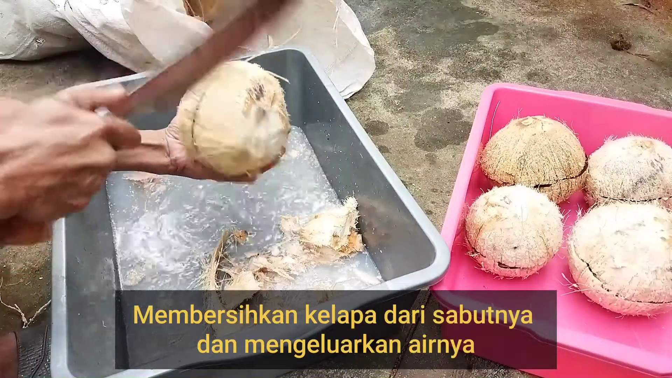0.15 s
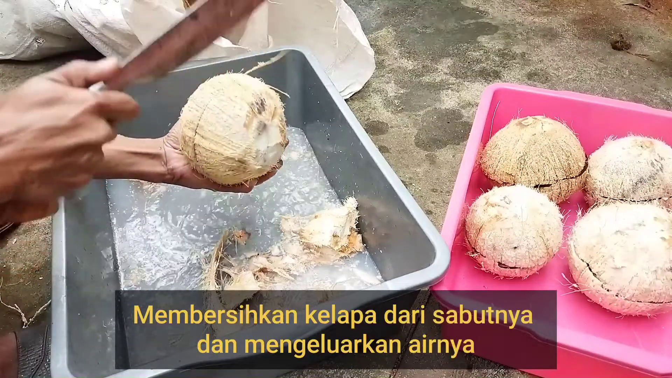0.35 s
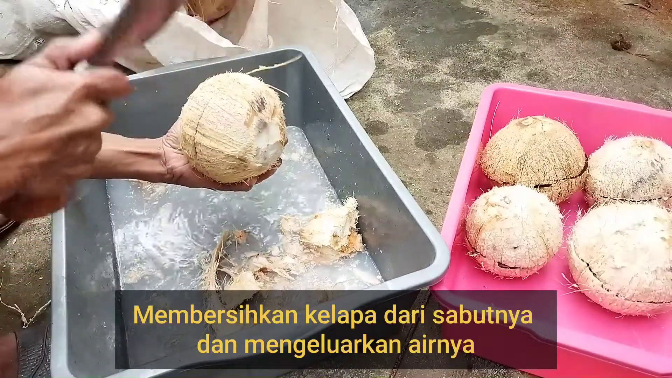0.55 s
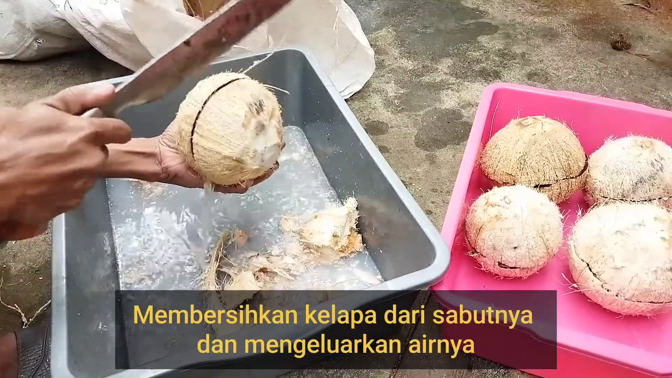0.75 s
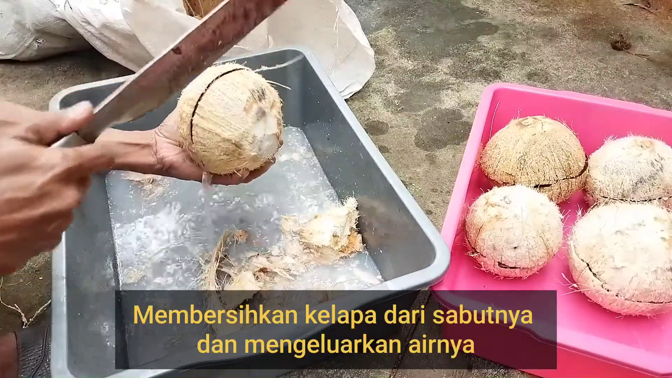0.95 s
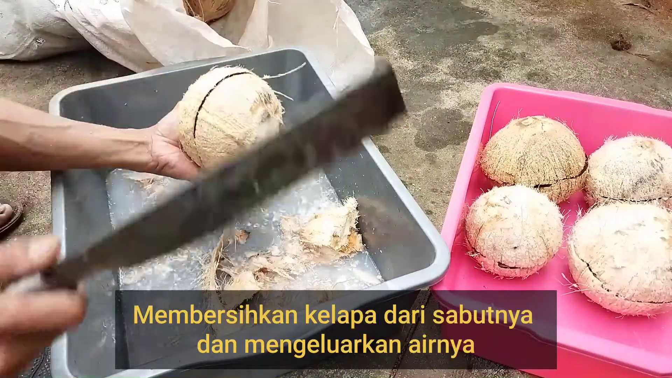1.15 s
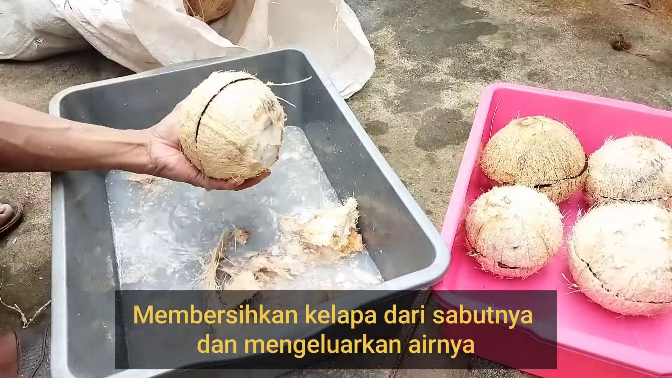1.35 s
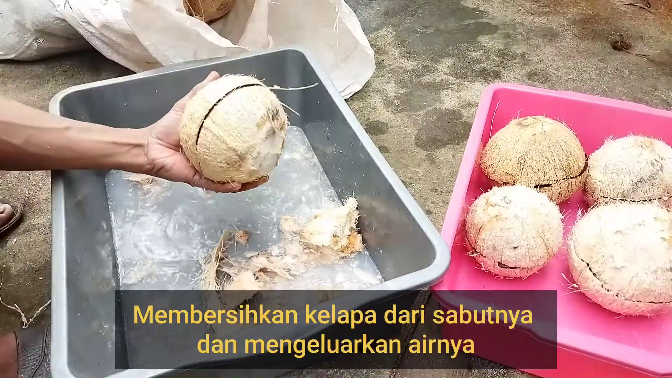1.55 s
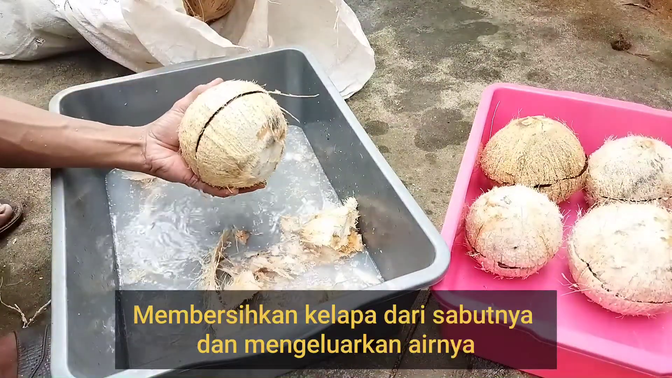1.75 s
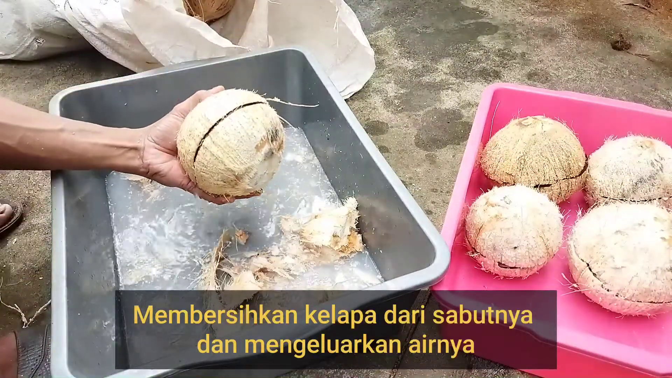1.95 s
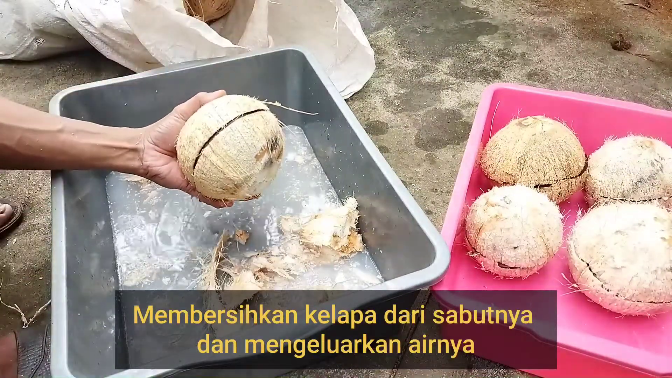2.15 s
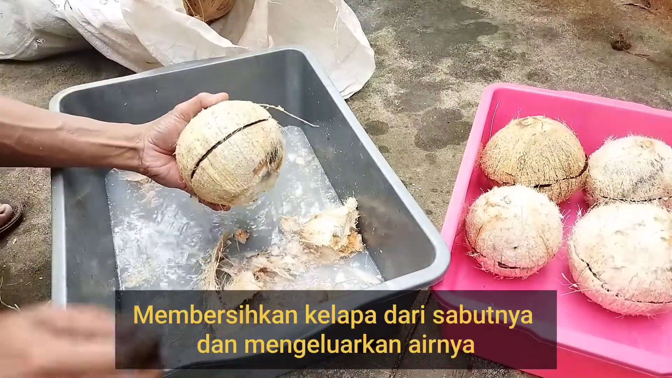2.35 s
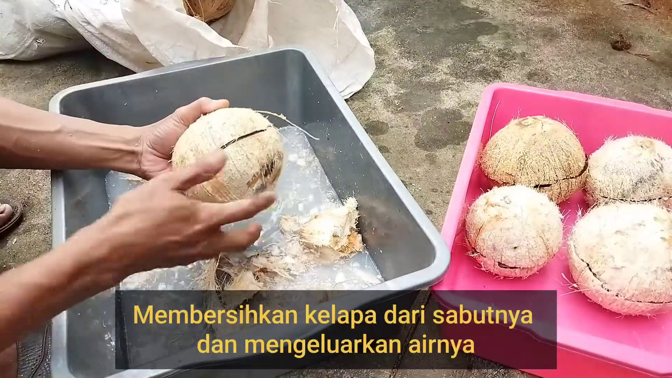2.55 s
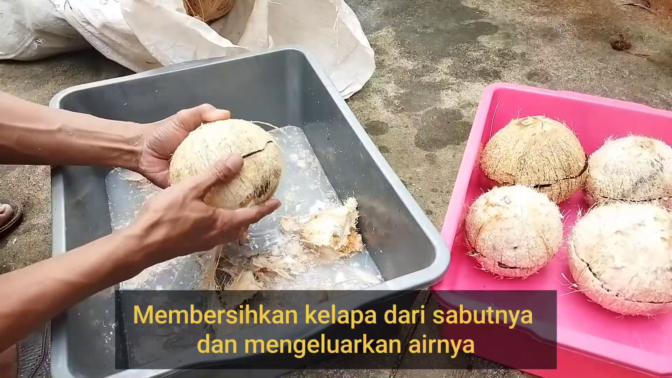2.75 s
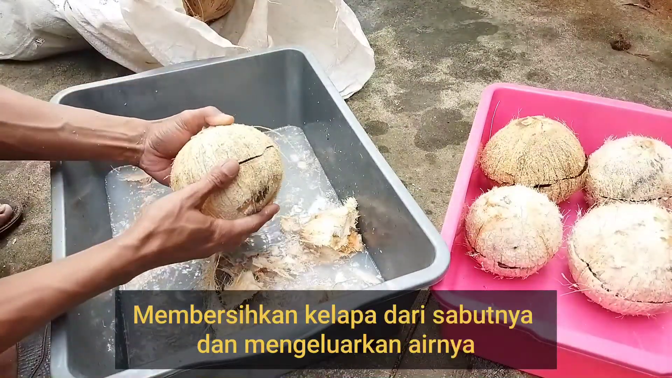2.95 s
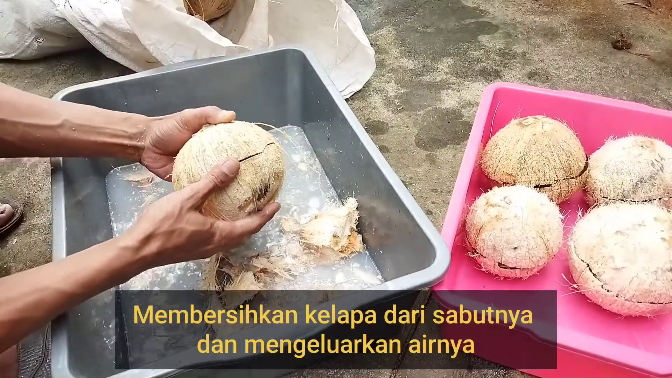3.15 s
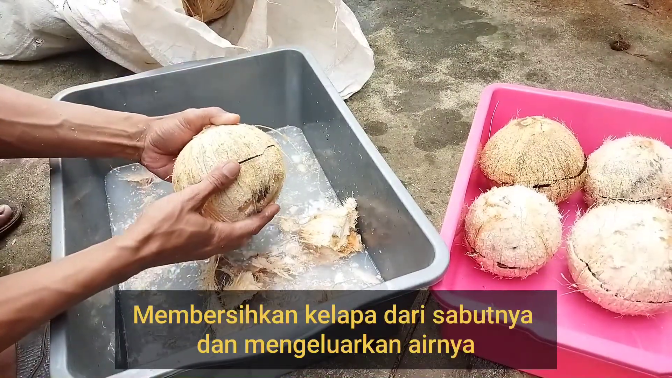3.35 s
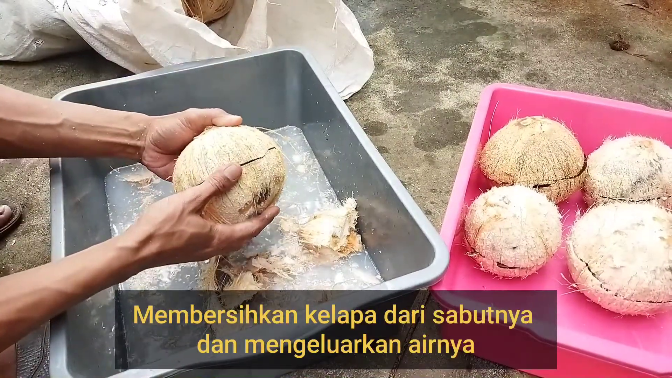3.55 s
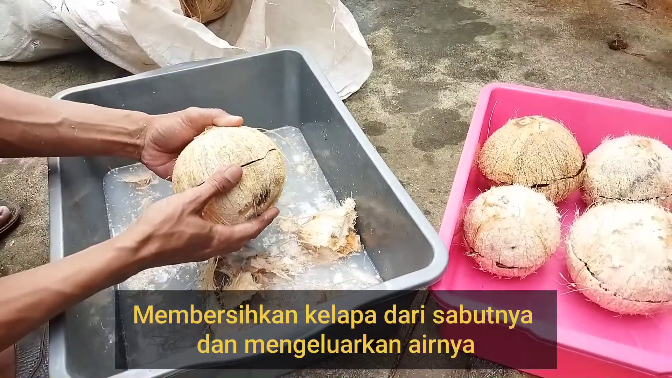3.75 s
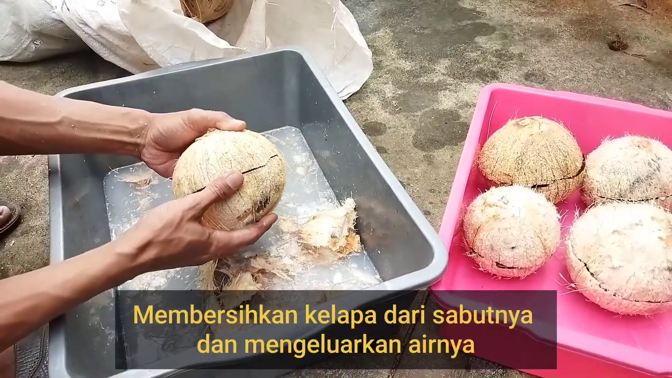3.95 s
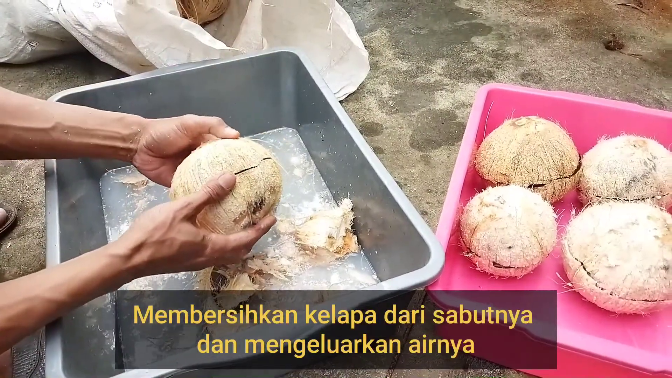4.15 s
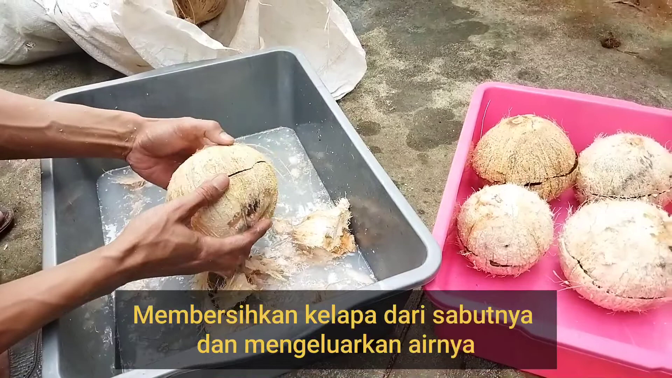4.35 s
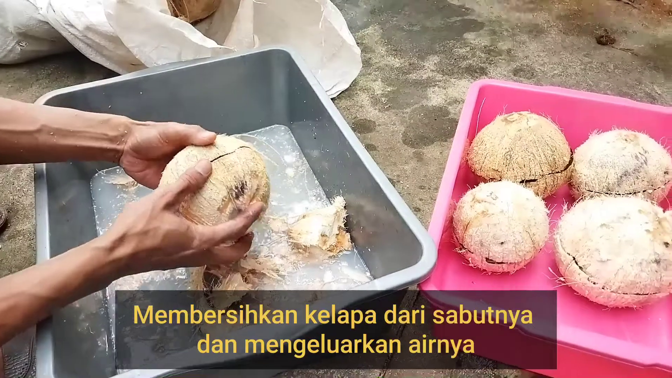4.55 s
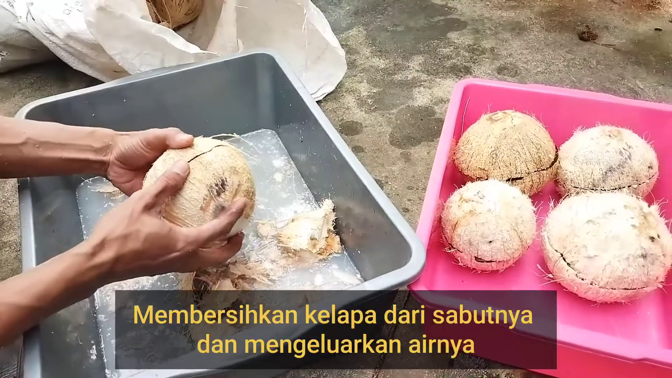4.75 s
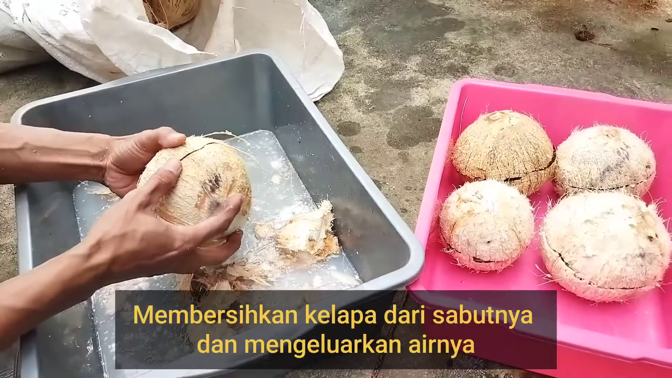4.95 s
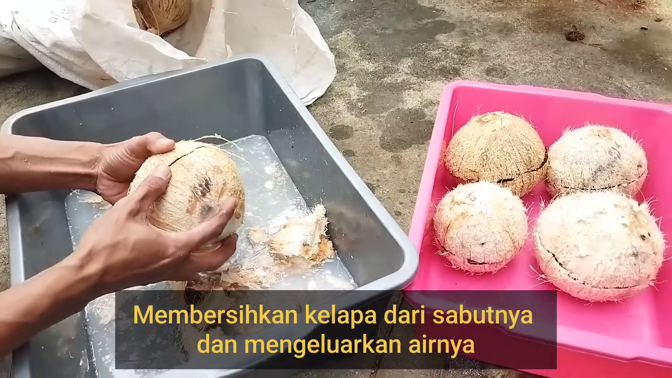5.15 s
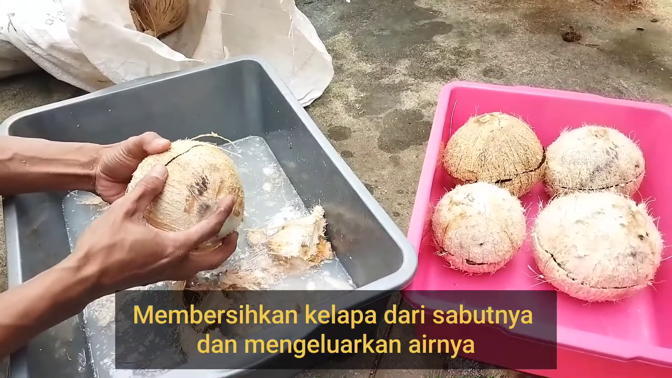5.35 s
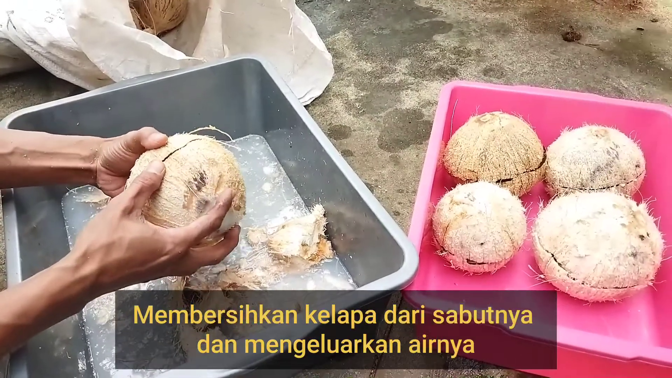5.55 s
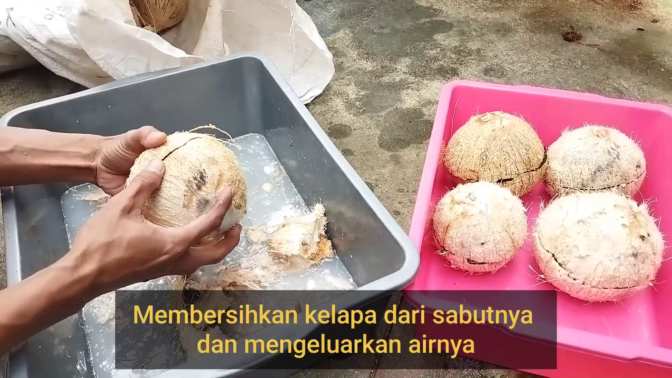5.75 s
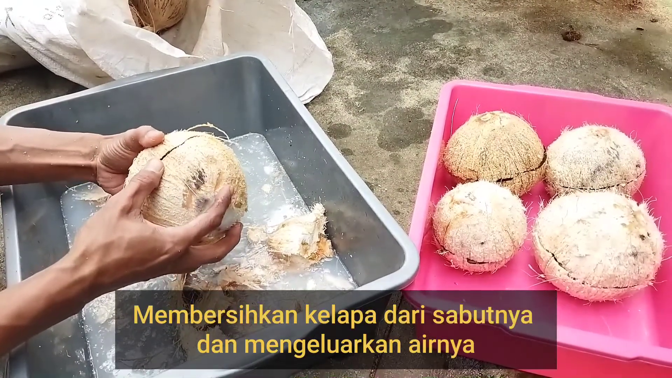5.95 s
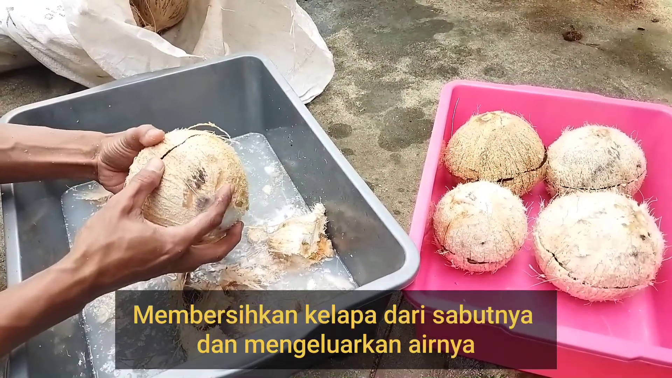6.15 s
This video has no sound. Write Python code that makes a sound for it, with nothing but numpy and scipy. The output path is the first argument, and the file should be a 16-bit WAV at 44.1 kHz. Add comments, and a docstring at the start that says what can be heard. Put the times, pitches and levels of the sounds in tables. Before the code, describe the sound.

Two hard knife chops crack a husked coconut outdoors, then the blade clinks down and coconut water trickles into a plastic tub over faint engine rumble.

```python
"""Two blows of a heavy knife into a husked coconut: ringing nut and shell modes, noise cracks, a yard echo.
Hands prise at the husk, so wet fibres crackle as clumped clicks and snap as short noise bursts.
The knife is laid on the ground with a knock and two scrapes, gritty noise that rings its blade modes.
Coconut water trickles into a plastic tub as a crowd of tiny resonances, with noisy drips and rising plinks.
Behind it all, a distant engine rumbles as filtered noise and wavering harmonics in open air."""
import sys
import numpy as np
from scipy import signal
from scipy.fft import rfft, irfft, next_fast_len
from scipy.io import wavfile

SR = 44100
rng = np.random.default_rng(int(sys.argv[2]) if len(sys.argv) > 2 else 0)


def materialize(psi):
    """Save the field psi as 16-bit PCM at rate SR to the path in sys.argv[1].

    A 1-D psi becomes a single channel; in a 2-D psi each row is a channel.
    """
    bounded = np.clip(np.atleast_2d(psi).T, -1, 1)
    quanta = np.round(bounded * 32767).astype(np.int16)
    wavfile.write(sys.argv[1], SR, quanta)


N = 272979
AGE = np.arange(SR // 2) / SR   # seconds since an event began
CUTOFF_HZ = 15750
RIGHT_LAG = 6   # samples

# All levels are relative: the layers apply their own gains on top.
# knife blows: start_s, thud_db, thud_low_edge_hz, shell_db, shell_pitch_ratio, crack_db, ring_db, echo_db
BLOWS = [(0.2661, -5.5, 190, -10, 0.99, -16.5, -32.5, -27),
         (0.722, -9.5, 160.5, -11.5, 0.756, -18, -28, -29)]
# modes of the water-filled nut in the hand, before tuning: pitch_hz, level_db, t60_s
NUT_MODES = [(230, -12, 0.14), (285.5, -4, 0.069), (335, -12, 0.058), (376.6, -14.5, 0.086)]
# modes of the hard shell wall, before each blow's pitch ratio: pitch_hz, level_db, t60_s
SHELL_MODES = [(600, -8.5, 0.064), (840, -16, .04), (1030, -7.5, 0.036), (1136, -6, 0.017),
               (1223, -8, 0.039), (1490, -2.5, 0.021), (1670, -12, .028), (2120, -15.5, 0.032),
               (3050, -9.5, 0.018)]
# modes of blade and tub ringing on after a blow, before tuning: pitch_hz, level_db, t60_s
RING_MODES = [(226.4, -13.5, 0.089), (333, -9.5, 0.24), (398.6, 0, 0.22), (427, 6.5, 0.19),
              (684, -7.5, 0.21), (828, -11, 0.16), (938, -6.5, 0.17), (1350, -18.5, 0.098), (2030, -19, .2)]
# spectrum of the shell fracture: frequency_hz, level_db (per Hz)
CRACK_SPECTRUM = [(100, -32), (500, 7), (1200, 5), (2000, -2), (2800, 0), (4500, -1), (6200, -2),
                  (7500, -11), (9500, 0), (11800, 2.5), (13000, -7.5), (16000, -7)]
# spectrum of a blow's echo in the yard: frequency_hz, level_db (per Hz)
ECHO_SPECTRUM = [(60, -18.5), (140, -12), (220, 1), (400, 3.5), (520, -8), (1000, -5.5), (2000, -10.5),
                 (4500, -14.5), (7500, -26), (11000, -13), (16000, -27.5)]

# shifts of grip that make wet husk crackle: start_s, level_db, length_s
GRIP_SHIFTS = [(0.0, -48, 0.02), (0.878, -52, 0.14), (1.094, -59.5, 0.11), (1.296, -57, 0.052),
               (1.53, -47, 0.038), (2.462, -53, 0.15), (2.72, -56, 0.069), (2.953, -53, .09),
               (3.33, -50, 0.12), (3.803, -54, 0.16), (4.037, -58.5, 0.17), (4.979, -62.5, 0.45),
               (5.645, -59, 0.061), (5.891, -56, 0.072)]
RUB_ATTACK_S, RUB_T60_S = 0.0062, 0.54
# spectrum of the husk crackle: frequency_hz, level_db (per Hz)
HUSK_SPECTRUM = [(400, -13), (1500, -0.5), (3500, 0.5), (5000, -3), (6400, -2), (7400, -11), (9300, 2),
                 (12000, 2), (15500, -2)]
HUSK_DB = -4.5
# loudest snaps of wet fibres: start_s, level_db, centre_hz, left_over_right_db
LOUD_TICKS = [(0.4532, -38, 8440, 7), (0.508, -37, 5550, 4), (0.8662, -30, 10300, 1.5),
              (1.0859, -38, 12000, 2.0), (1.279, -35, 9300, 9), (1.6048, -32.5, 12600, 1.5),
              (1.8576, -30.5, 6850, 1), (2.076, -37, 8900, 4), (2.3184, -32, 10800, 5),
              (2.354, -24.5, 13000, 2.0), (2.4433, -31.5, 11900, 2), (2.48, -29, 9100, 3),
              (2.5256, -29, 9600, 0), (2.729, -31.5, 14700, 2), (3.0547, -32.5, 11700, 0.0),
              (4.121, -39, 10800, 3), (4.145, -34.5, 13200, -1.0), (4.7765, -38.5, 10500, 2.0),
              (4.9858, -37.5, 7900, 9), (5.5352, -33.5, 6690, -2), (5.6286, -31.5, 11900, 0),
              (5.848, -32.5, 11600, -1.5)]
LOUD_TICK_DB = -6   # added to every loud snap
FAINT_TICKS, FAINT_TICK_DB, FAINT_TICK_SPREAD_DB = 24, -38, 5.5
FAINT_TICK_HZ = 10500   # middle of a one-octave range
FAINT_TICK_FOLLOWS = 0.71   # dB of snap per dB of water flow

# knife touching the ground: start_s, level_db, slide_s, t60_s, centre_hz, left_over_right_db
KNIFE_CONTACTS = [(1.735, -48, 0.0084, .03, 9000, 7), (1.7459, -32, 0.006, 0.065, 670, -1),
                  (1.949, -44, 0.0093, 0.056, 3980, -6), (1.957, -38, 0.0032, 0.036, 4930, 13),
                  (1.9673, -31.5, 0.011, 0.1, 2320, 1), (2.189, -38, 0.01, 0.15, 1820, 0),
                  (2.2, -34.5, 0.0069, 0.081, 2780, 2)]
# modes of the knife: pitch_hz, level_db, t60_s
KNIFE_MODES = [(563, -0.5, 0.043), (956, -1, 0.017), (1368, 0, 0.056), (1740, 5.5, 0.034), (2070, 6, 0.21),
               (2080, 2, 0.022), (2636, 4, 0.054), (3160, -5, 0.036), (3850, 2.5, 0.09), (4700, -8, 0.074),
               (4960, -3, 0.031), (5320, 6.5, 0.15), (9000, -2, 0.034), (11700, 5, 0.092),
               (13400, -2, 0.092), (14800, -3, .1)]

# the gush swells, peaks, then ebbs to a dribble
FLOW_PEAK_S, SWELL_DB_PER_S, EBB_DB_PER_S, DRIBBLE_DB = 1.65, 14, 6, -13.5
SPLASH_DB, SPATTER_DB = -52.5, -52   # bubbles and fine spatter, before the flow is applied
# spectrum of the small bubbles: pitch_hz, level_db
BUBBLE_SPECTRUM = [(520, 4), (900, -5), (1700, -3.5), (2700, -4), (4200, -9.5)]
# spectrum of the fine spatter: pitch_hz, level_db
FIZZ_SPECTRUM = [(3500, -1.5), (5600, -6), (6500, 0), (7300, -16.5), (9200, 7), (11200, 3), (11900, 3.5),
                 (14500, -1.5), (15600, 2)]
# biggest drops landing in the tub: start_s, level_db, centre_hz
BIG_DROPS = [(0.037, -36, 910), (0.936, -45, 1220), (1.16, -37.5, 1120), (1.288, -46, 859),
             (1.318, -41.5, 1720), (1.414, -41.5, 1680), (1.438, -41, 1670), (1.596, -33.5, 2980),
             (1.894, -44, 1670), (2.047, -41, 2720), (2.076, -42.5, 1240), (2.26, -37.5, 2020),
             (2.373, -37, 1810), (2.414, -40.5, 2100), (2.497, -39, 2200), (2.953, -45, 1730),
             (3.054, -41.5, 3970), (3.479, -43.5, 3836), (3.604, -45.5, 1520), (4.528, -45, 1930),
             (5.191, -48.5, 1670)]
DROP_DB, DROP_PAN_DB = -7, 0.5   # the level is added to every drop
# single larger bubbles, in the tub or inside the draining nut: start_s, level_db, starting_pitch_hz, t60_s
BIG_BUBBLES = [(1.0, -37.5, 2620, 0.044), (1.593, -27, 3046, 0.057), (3.28, -45.5, 335, 0.11),
               (4.163, -39.5, 2870, 0.05), (4.28, -44, 2740, .04)]

# spectrum of the distant engine's rumble: frequency_hz, level_db (per Hz)
RUMBLE_SPECTRUM = [(20, -34), (45, -26), (70, -13), (100, -1.5), (130, 2.5), (175, -3.5), (230, -8.5),
                   (280, -10.5), (420, -16), (700, -34), (1500, -58)]
# spectrum of the open air: frequency_hz, level_db (per Hz)
AIR_SPECTRUM = [(100, 4), (500, 3), (1500, -3), (3000, -4.5), (7000, -49), (16000, -18.5)]
# the far engine idles, then slows: time_s, firing_rate_hz
FIRING_RATE = [(0, 33.3), (2.2, 33.6), (3.5, 33.8), (4.5, 31), (5.1, 30.4), (5.8, 29.1), (6.19, 30)]
# level of an engine harmonic by where it falls: pitch_hz, level_db
HARMONIC_LEVELS = [(95, -6.5), (125, -4), (148, -3.5), (157, -15.5), (168, 0), (188, 1.5), (200, -8),
                   (240, -14)]
RUMBLE_DB, DRONE_DB = -57, -57.5


def chops():
    """The blade thumps the nut, rings its wall, and breaks in with a crack and a short crunch."""
    out = np.zeros((2, N))
    for s, thud_db, edge_hz, shell_db, pitch, crack_db, ring_db, echo_db in BLOWS:
        nut = struck(NUT_MODES, 0.95)
        # a small body radiates little bass
        thin_nut = high_pass(nut, edge_hz, order=4) + from_db(-14) * nut
        thud = from_db(thud_db) * thin_nut * pan(-6.0)

        wall = high_pass(struck(SHELL_MODES, pitch), 560 * pitch, order=2)
        shell = from_db(shell_db) * wall * pan(-2.1)
        ring = from_db(ring_db) * struck(RING_MODES, 0.93) * (1 - fade(0.036)) * pan(-2.5)

        # fibres give way unevenly until the blade stops
        tearing = from_db(drift(906)[:len(AGE)])
        crunch = fade(0.04, hold=0.016) * tearing
        bite = fade(0.025, hold=0.0022) + from_db(-10.5) * crunch
        fracture = colour(stereo_noise(likeness=0.11, size=len(AGE)), CRACK_SPECTRUM)
        crack = from_db(crack_db) * bite * fracture * pan(1.3)

        echo = from_db(echo_db) * yard_echo(low_t60=0.41, high_t60=0.26, split_hz=510)
        add(out, s, thud + shell + ring + crack + echo)
    return out


def yard_echo(low_t60, high_t60, split_hz):
    """Diffuse echo of one blow: noise that builds, then decays in two bands, the lows lingering longest."""
    wash = colour(stereo_noise(likeness=0.7, size=len(AGE)), ECHO_SPECTRUM)
    low = signal.sosfilt(signal.butter(2, split_hz, fs=SR, output="sos"), wash)
    high = high_pass(wash, split_hz, order=2)
    patchy = from_db(1.1 * drift(250)[:len(AGE)])   # the highs return unevenly
    decay = low * fade(low_t60) + high * patchy * fade(high_t60)
    return decay * (1 - fade(0.022))


def husk():
    """Tiny clicks of the fibres under the fingers, as strong as the rubbing."""
    clicks = tub(grains(per_s=200, spread_db=7.5, wander_db=2.5), wet_db=0.0, t60=0.022)
    return from_db(HUSK_DB) * rubbing() * colour(clicks, HUSK_SPECTRUM) * pan(2.0)


def rubbing():
    """Strength of the husk's crackle: each shift of grip builds, holds and lets go."""
    out = np.zeros((1, N))
    for s, db, length in GRIP_SHIFTS:
        attack = np.minimum(AGE / RUB_ATTACK_S, 1)
        add(out, s, from_db(db) * attack * fade(RUB_T60_S, length))
    return out[0]


def fibres():
    """Wet fibres snap as short noise bursts: some loud, some faint; the faint are louder with more flow."""
    flow = flow_db()
    faint = []
    for at, size, pitch in rng.random((FAINT_TICKS, 3)):
        db = FAINT_TICK_DB + FAINT_TICK_FOLLOWS * flow[int(at * N)]
        db += FAINT_TICK_SPREAD_DB * (2 * size - 1)
        faint.append((at * N / SR, db, FAINT_TICK_HZ * 2 ** (pitch - 0.5), 3))
    loud = [(s, db + LOUD_TICK_DB, hz, side_db) for s, db, hz, side_db in LOUD_TICKS]
    return bursts(loud + faint, width=0.25, hold=0.0013, t60=0.011,
                  tail_db=-24, tail_t60=0.07, likeness=0.4)


def knife(grit_db, ring_db, tap_db):
    """Each contact begins with a tap; then grit rasps under the sliding knife and keeps its modes ringing."""
    rasp = np.zeros((2, N))
    for s, db, slide, t60, hz, side_db in KNIFE_CONTACTS:
        roughness = from_db(3.3 * drift(522)[:len(AGE)])
        force = stereo_noise(likeness=0.083, size=len(AGE)) * roughness * (1 - fade(0.0034))
        force[:, 0] += from_db(tap_db)
        grit = rms_one(resonate(force, hz, 0.75 * hz) + from_db(-8.5) * force)
        add(rasp, s, from_db(db) * grit * fade(t60, slide) * pan(side_db))
    rings = 0
    for hz, db, t60 in KNIFE_MODES:
        width_hz = np.log(1000) / np.pi / t60   # the bandwidth that gives this decay
        rings = rings + from_db(db) * resonate(rasp, hz, width_hz)
    return from_db(grit_db) * rasp + from_db(ring_db) * rings


def trickle():
    """Small bubbles ring at scattered pitches under a fizz of fine spatter and wet fibres."""
    flow = from_db(flow_db())
    bubbles = droplets(per_s=330, spread_db=4, spectrum=BUBBLE_SPECTRUM, sharpness=6.2, count=24)
    fizz = droplets(per_s=800, spread_db=4.0, spectrum=FIZZ_SPECTRUM, sharpness=38, count=44)
    splash = from_db(SPLASH_DB) * flow * tub(bubbles, wet_db=4.5, t60=0.052)
    fizz_gain = np.hypot(from_db(SPATTER_DB) * flow, rubbing())   # water and fibres share the fizz
    return splash + fizz_gain * tub(fizz, wet_db=4.0, t60=0.072) * pan(2.5)


def flow_db():
    """Flow of the coconut water against the peak of the gush, in dB, with a steady dribble beneath."""
    late = np.arange(N) / SR - FLOW_PEAK_S
    gush = from_db(np.minimum(SWELL_DB_PER_S * late, -EBB_DB_PER_S * late))
    return 20 * np.log10(np.hypot(gush, from_db(DRIBBLE_DB)))


def drips():
    """Big drops splat into the shallow water of the tub as resonant noise bursts."""
    drops = [(s, db + DROP_DB, hz, DROP_PAN_DB) for s, db, hz in BIG_DROPS]
    return bursts(drops, width=0.25, hold=0.0019, t60=0.044,
                  tail_db=-12.5, tail_t60=0.14, likeness=0.037)


def plinks(rise):
    """A bubble swells into a tone that rises in pitch as it dies away."""
    out = np.zeros((2, N))
    for s, db, hz, t60 in BIG_BUBBLES:
        pitch_hz = hz * (1 + rise * np.minimum(AGE / t60, 1))
        tone = np.sin(2 * np.pi * np.cumsum(pitch_hz) / SR)
        add(out, s, from_db(db) * fade(t60) * (1 - fade(t60 / 4)) * tone)
    return out


def yard():
    """A far engine's uneven rumble and drone, and the hush of open air as steady noise."""
    rumble = colour(stereo_noise(likeness=0.92, size=N), RUMBLE_SPECTRUM)
    air = colour(stereo_noise(likeness=0.12, size=N), AIR_SPECTRUM)
    return from_db(RUMBLE_DB + 1.5 * drift(9)) * rumble + drone(count=5) + from_db(-65.0) * air


def drone(count):
    """Harmonics of the engine's firing rate from the third up, each wavering in level on its own."""
    speed, = in_time(FIRING_RATE)
    phase = 2 * np.pi * np.cumsum(speed + 0.15 * drift(8)) / SR
    hz, db = np.transpose(HARMONIC_LEVELS)
    total = 0
    for k in 3 + np.arange(count):
        level = from_db(np.interp(k * speed, hz, db) + 3.0 * drift(7))
        total = total + level * np.sin(k * phase + 2 * np.pi * rng.random())
    return from_db(DRONE_DB) * total


def bursts(events, width, hold, t60, tail_db, tail_t60, likeness):
    """Brief noise splats, each resonating round its own pitch, with a fainter, longer tail."""
    out = np.zeros((2, N))
    for s, db, hz, side_db in events:
        shape = fade(t60, hold) + from_db(tail_db) * fade(tail_t60)
        splat = resonate(stereo_noise(likeness, size=len(AGE)) * shape, hz, width * hz)
        add(out, s, from_db(db) * rms_one(splat) * np.sqrt(np.mean(shape ** 2)) * pan(side_db))
    return out


def droplets(per_s, spread_db, spectrum, sharpness, count):
    """Random tiny impacts, each ringing one of many resonances; sharpness is pitch over bandwidth."""
    pops = grains(per_s, spread_db, wander_db=1.5)
    dealt = rng.integers(0, count, N)   # which resonance each impact rings
    hz, db = np.transpose(spectrum)
    pitches = np.geomspace(hz[0], hz[-1], count)
    gains = from_db(np.interp(np.log(pitches), np.log(hz), db))
    total = 0
    for k, (f, gain) in enumerate(zip(pitches, gains)):
        total = total + gain * resonate(pops * (dealt == k), f, f / sharpness)
    return total


def grains(per_s, spread_db, wander_db):
    """Random clicks of uneven size, in clumps, each at its own place."""
    born = rng.random(N) < per_s * from_db(4 * drift(25)) / SR
    sizes = from_db(spread_db * np.minimum(rng.exponential(1, N), 4)) * rng.choice([-1, 1], N)
    return born * sizes * from_db(wander_db * rng.standard_normal(N) * [[1], [-1]])


def tub(x, wet_db, t60):
    """Dense short reflections between the tub walls, different at each microphone; rms 1."""
    walls = rng.standard_normal((2, len(AGE))) * fade(t60) * (1 - fade(0.0044))
    walls = walls / np.sqrt(np.sum(walls ** 2) / 2)
    wet = signal.fftconvolve(x, walls, axes=1)[:, :N]
    return rms_one(x + from_db(wet_db) * wet)


def struck(modes, pitch):
    """Decaying sines of a struck body, all tuned by one pitch ratio."""
    return sum(from_db(db) * fade(t60) * np.sin(2 * np.pi * hz * pitch * AGE) for hz, db, t60 in modes)


def resonate(x, hz, width_hz):
    """One resonance as a two-pole filter with a gain of about 1 on top."""
    r = np.exp(-np.pi * width_hz / SR)
    w = 2 * np.pi * min(hz, CUTOFF_HZ) / SR
    feed = np.array([1, 0, -1]) * (1 - r * r) / 2
    return signal.lfilter(feed, [1, -2 * r * np.cos(w), r * r], x + 1e-18)


def high_pass(x, hz, order):
    """Roll off what lies below a frequency."""
    return signal.sosfilt(signal.butter(order, hz, "high", fs=SR, output="sos"), x)


def colour(x, spectrum):
    """Shape a sound by a spectrum; rms 1."""
    size = next_fast_len(x.shape[-1])
    hz, db = np.transpose(spectrum)
    gain = from_db(np.interp(np.log(np.fft.rfftfreq(size, 1 / SR) + 1), np.log(hz), db))
    return rms_one(irfft(rfft(x, size) * gain, size)[..., :x.shape[-1]])


def stereo_noise(likeness, size):
    """White noise that the two channels partly share."""
    mid, side = rng.standard_normal((2, size))
    c = np.clip(likeness, -1, 1)
    return rms_one(np.sqrt(1 + c) * mid + np.sqrt(1 - c) * side * [[1], [-1]])


def drift(rate):
    """Random wander with rms 1, turning at a rate per second."""
    knots = rng.standard_normal(int(N / SR * rate) + 2)
    return rms_one(np.interp(np.arange(N) / SR * rate, np.arange(len(knots)), knots))


def fade(t60, hold=0):
    """Full level for the hold time, then an exponential decay of 60 dB in t60 seconds."""
    return from_db(-60 * np.maximum(AGE - hold, 0) / t60)


def in_time(rows):
    """Each column of a curve at every sample."""
    s, *columns = np.transpose(rows)
    return [np.interp(np.arange(N) / SR, s, c) for c in columns]


def pan(db):
    """Left and right gains for a level difference, left over right."""
    return rms_one(from_db([[db / 2], [-db / 2]]))


def add(out, s, sound):
    """Mix a sound in at a time in seconds."""
    i = round(s * SR)
    out[:, i:i + sound.shape[-1]] += sound[..., :N - i]


def rms_one(x):
    """Scale to rms 1."""
    return x / np.sqrt(np.mean(x ** 2) + 1e-20)


def from_db(db):
    """Decibels to gain."""
    return 10 ** (np.asarray(db) / 20)


def from_left(x):
    """The work is to the left, so sound reaches the right microphone a few samples later."""
    return np.array([x[0], np.pad(x[1], (RIGHT_LAG, 0))[:N]])


def scene():
    """All sources at the two microphones."""
    work = chops() + husk() + fibres() + knife(grit_db=-4.0, ring_db=7, tap_db=8)
    water = trickle() + drips() + plinks(rise=0.1)
    return from_left(work + water + yard())


def record(dry):
    """Soft saturation rounds the loudest peaks, then a steep low-pass cuts the top."""
    rounded = 1.058 * np.tanh(dry / 1.127)
    return signal.sosfilt(signal.ellip(10, 0.1, 80, CUTOFF_HZ, fs=SR, output="sos"), rounded)


dry = scene()
out = record(dry)
materialize(out)
```